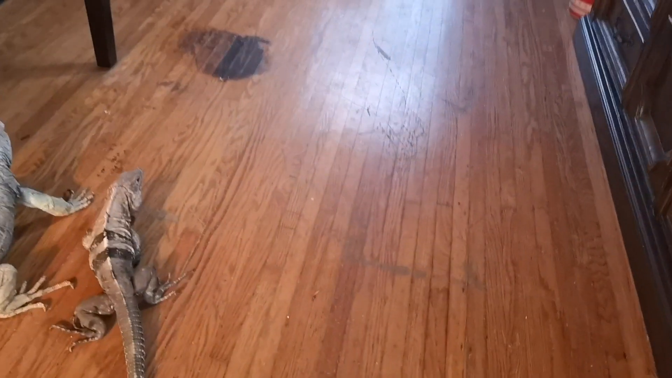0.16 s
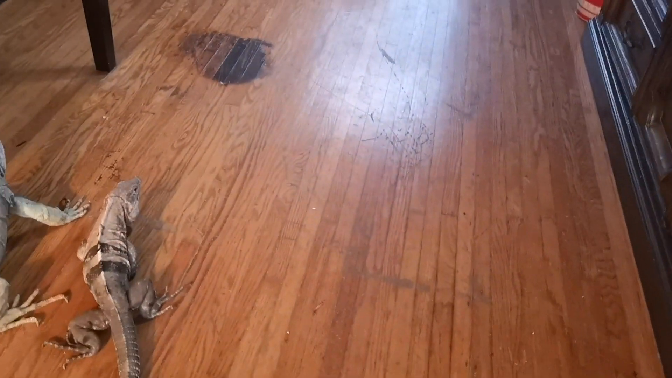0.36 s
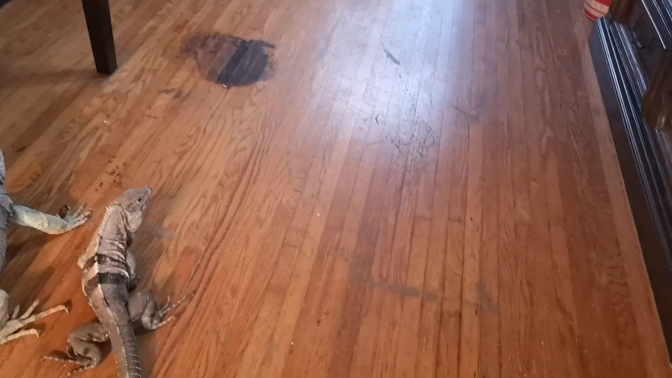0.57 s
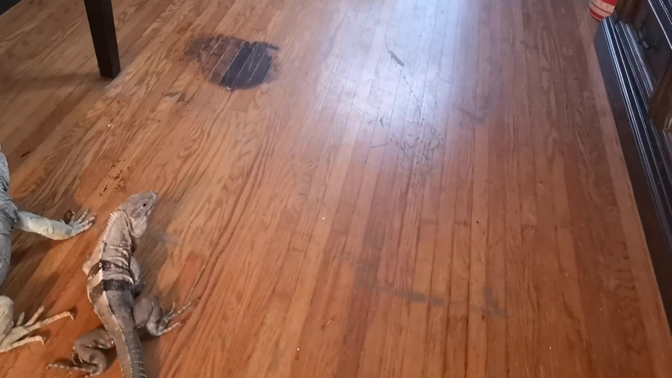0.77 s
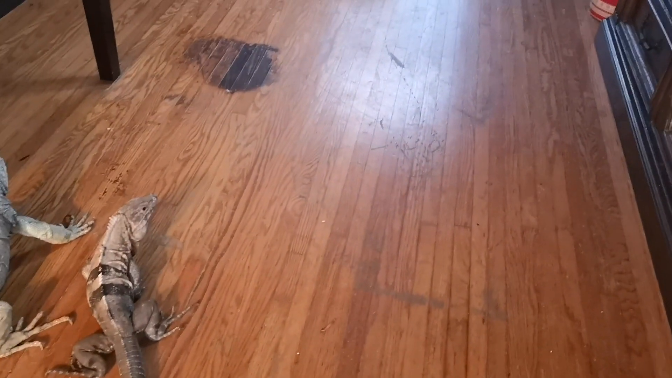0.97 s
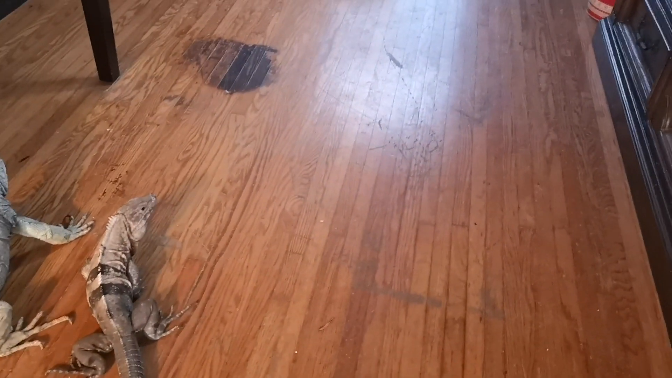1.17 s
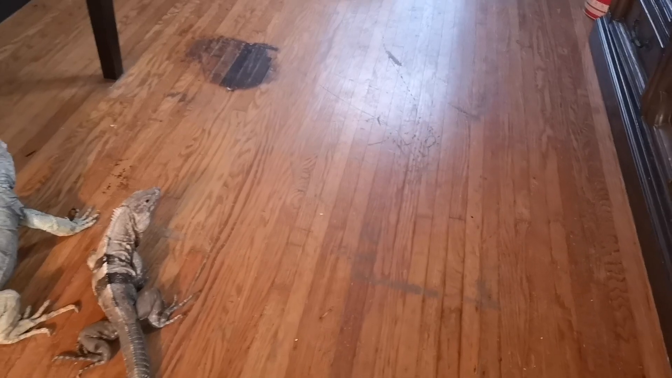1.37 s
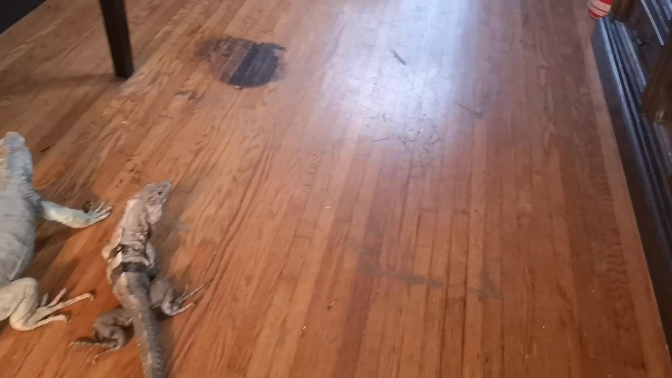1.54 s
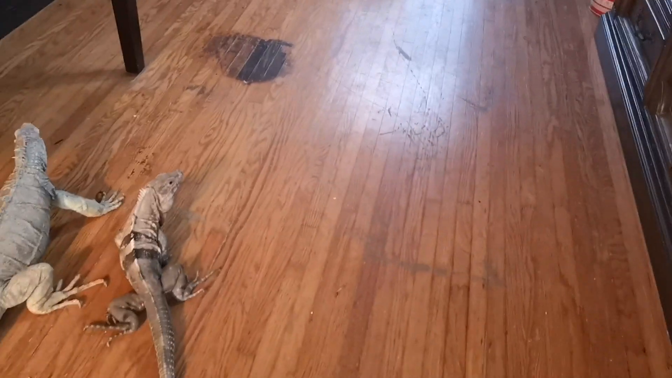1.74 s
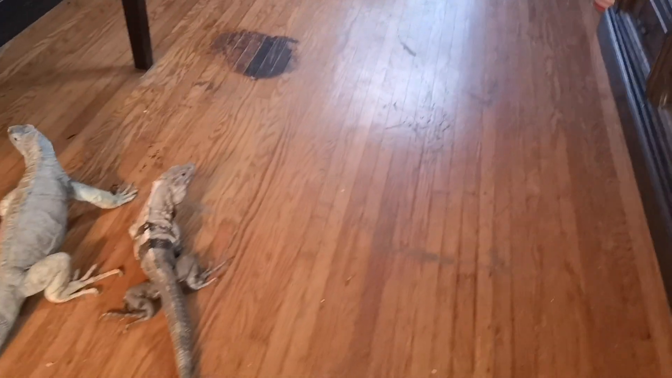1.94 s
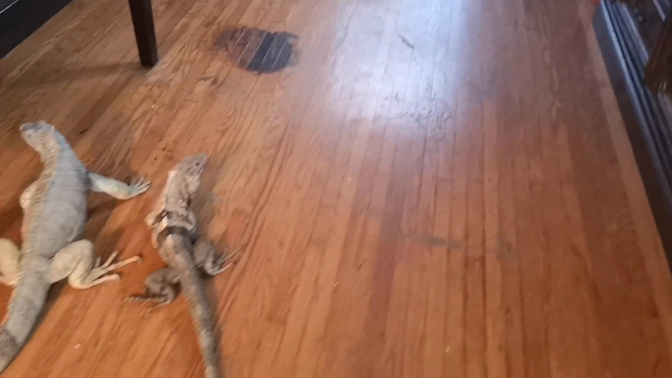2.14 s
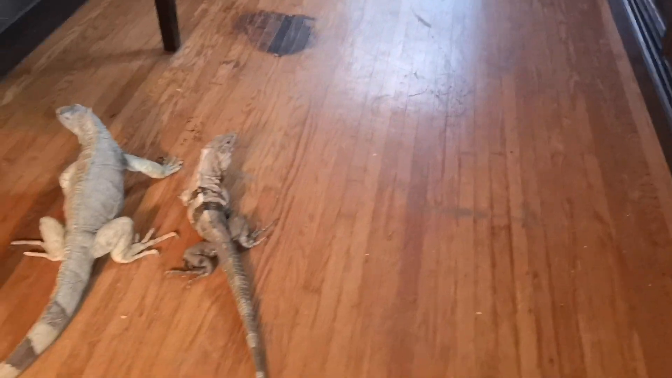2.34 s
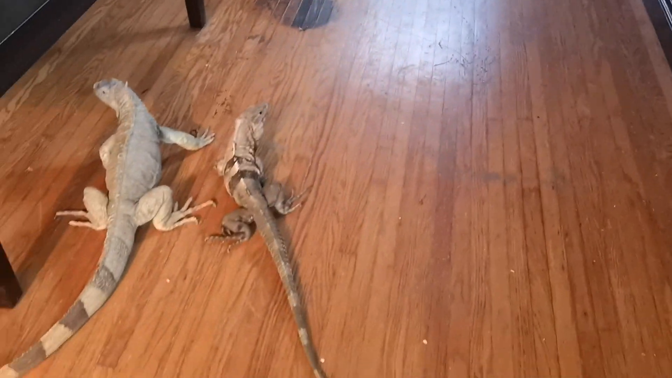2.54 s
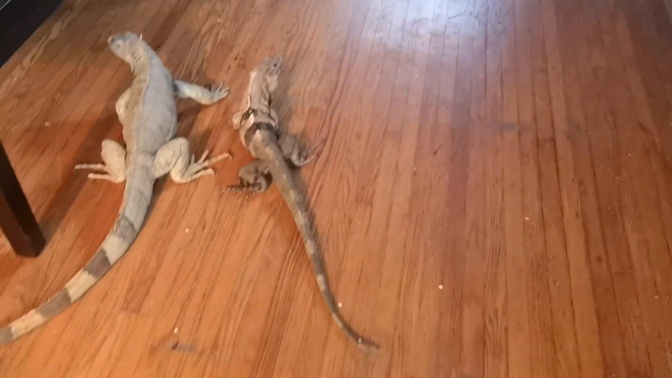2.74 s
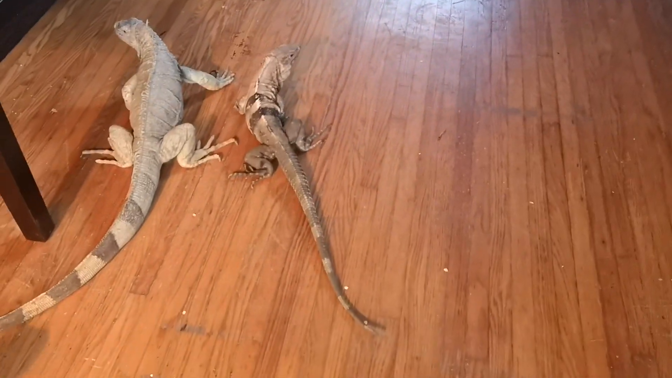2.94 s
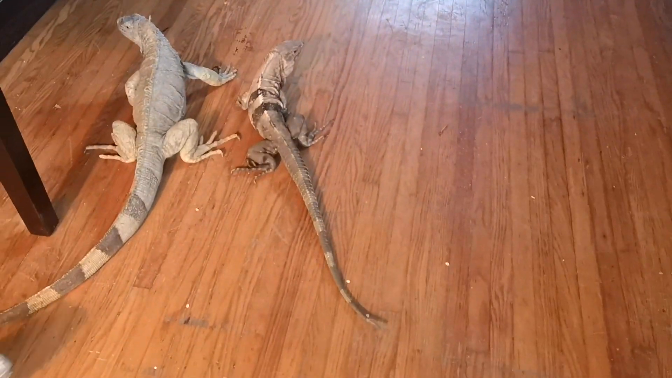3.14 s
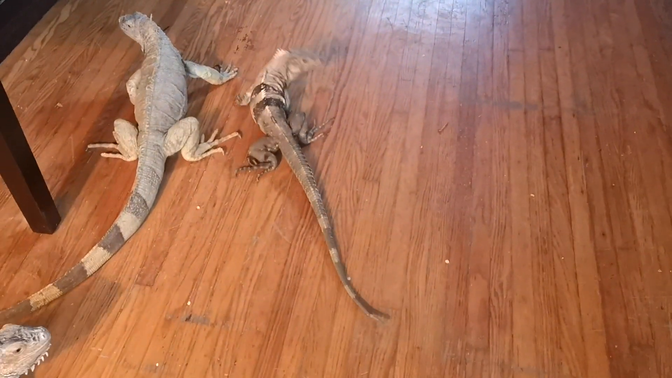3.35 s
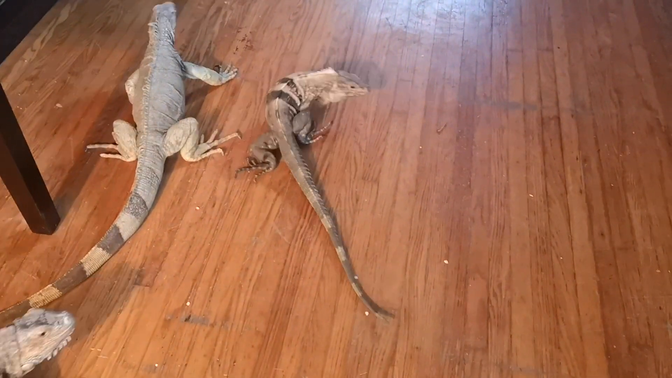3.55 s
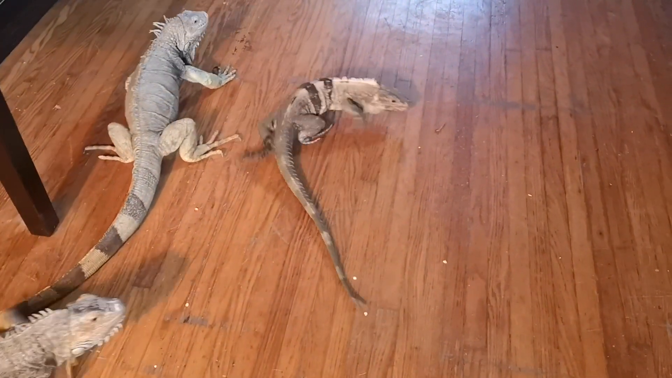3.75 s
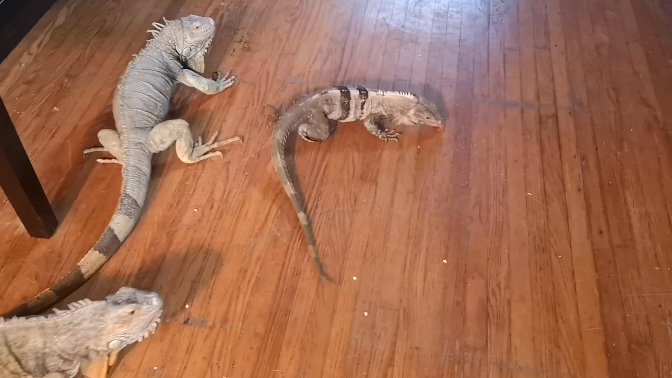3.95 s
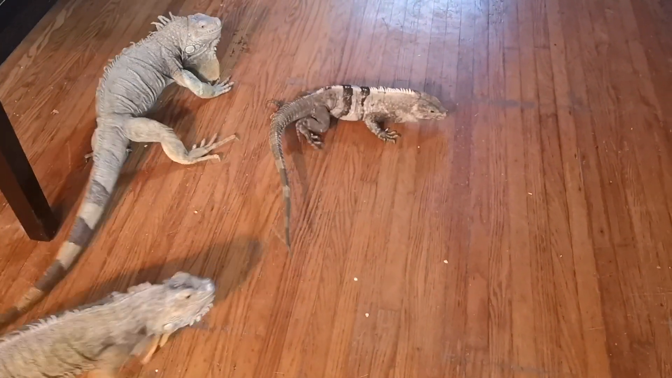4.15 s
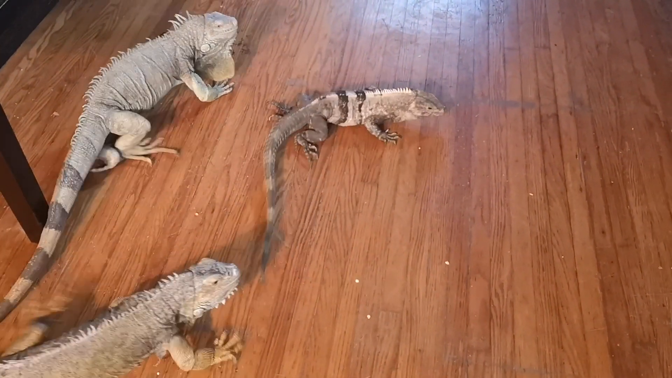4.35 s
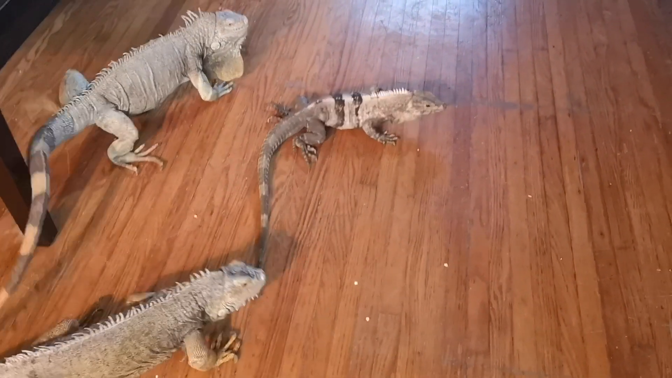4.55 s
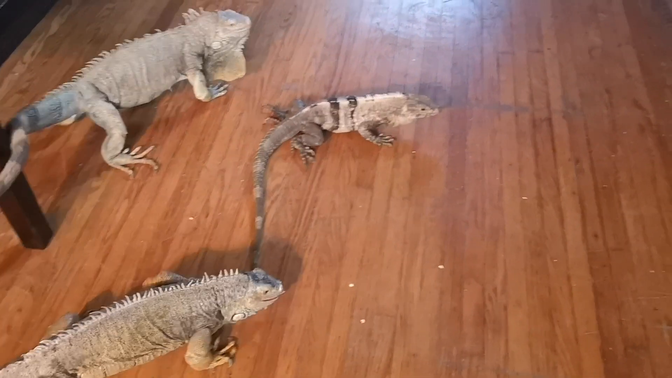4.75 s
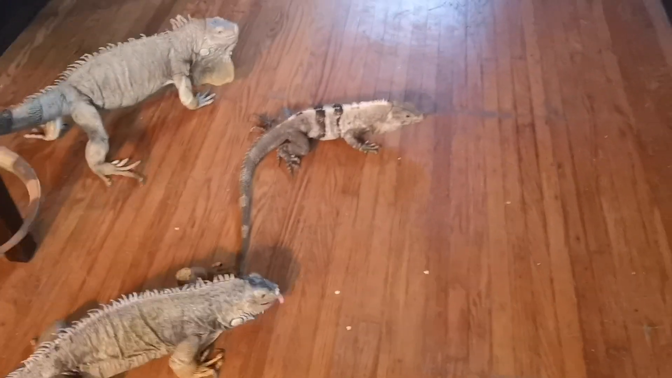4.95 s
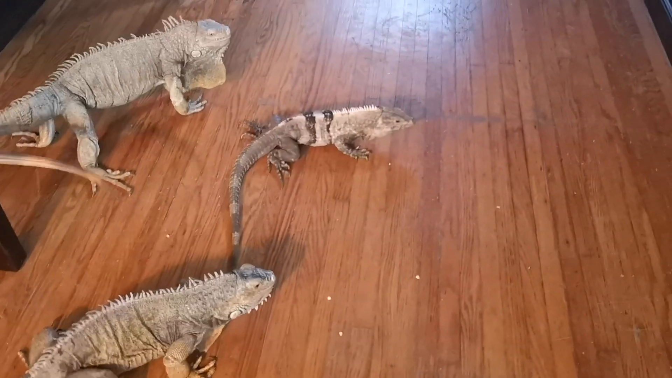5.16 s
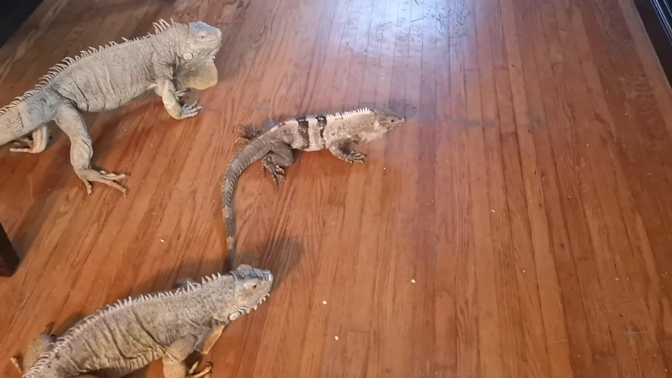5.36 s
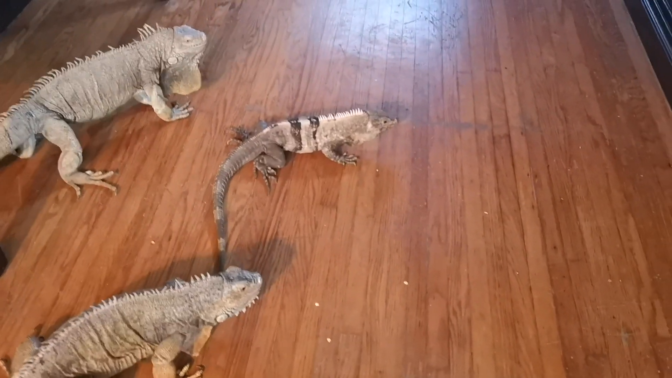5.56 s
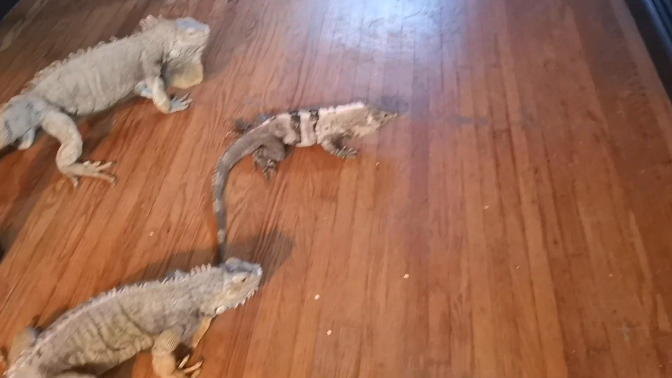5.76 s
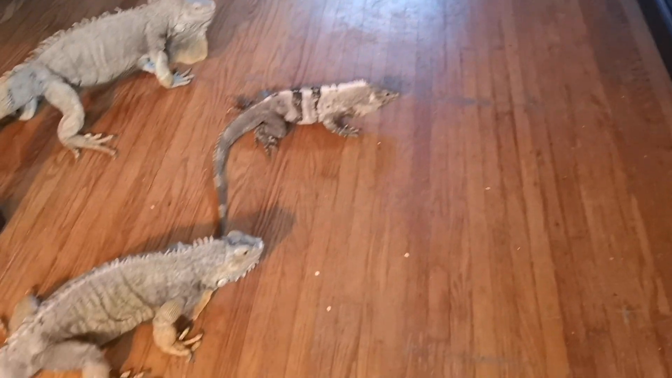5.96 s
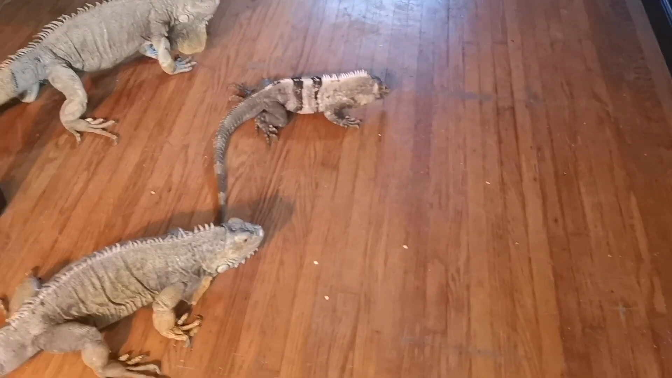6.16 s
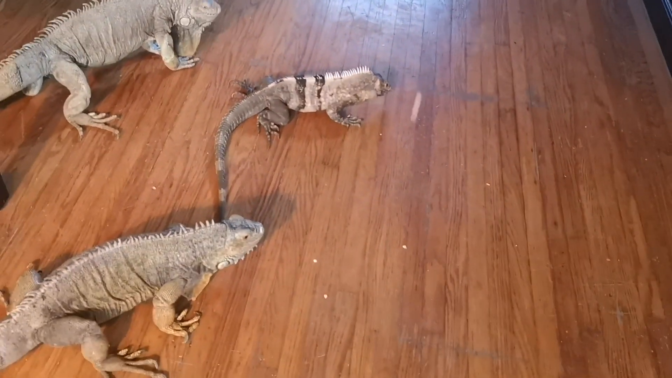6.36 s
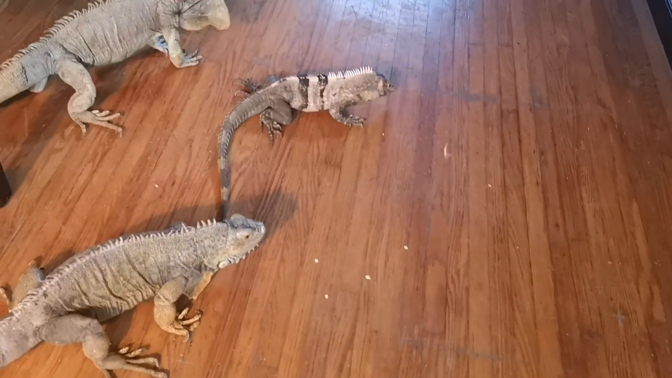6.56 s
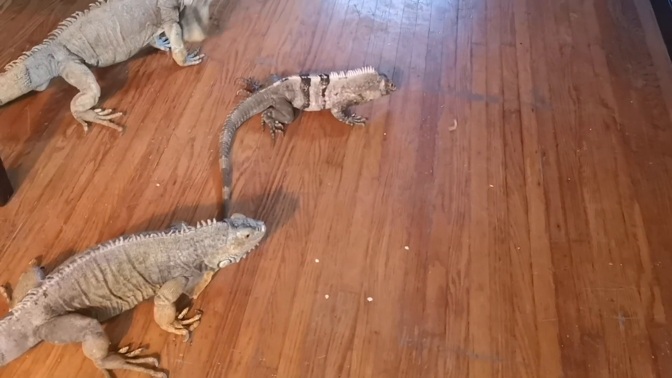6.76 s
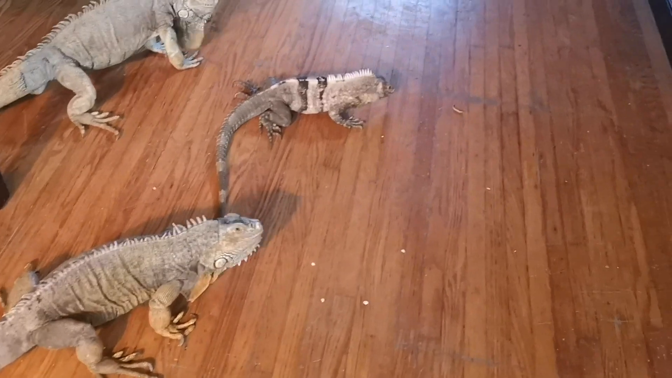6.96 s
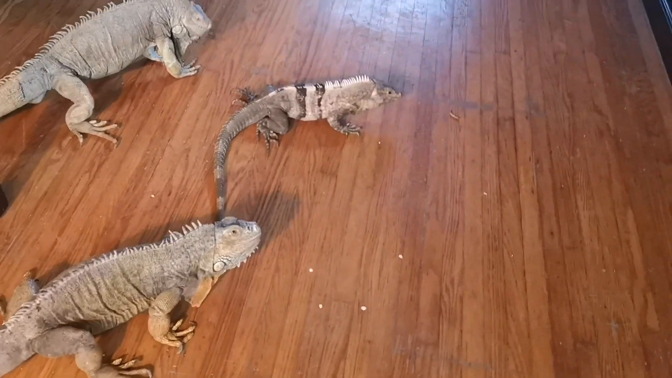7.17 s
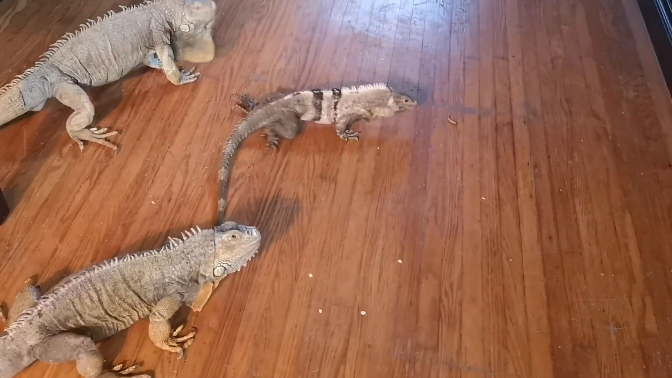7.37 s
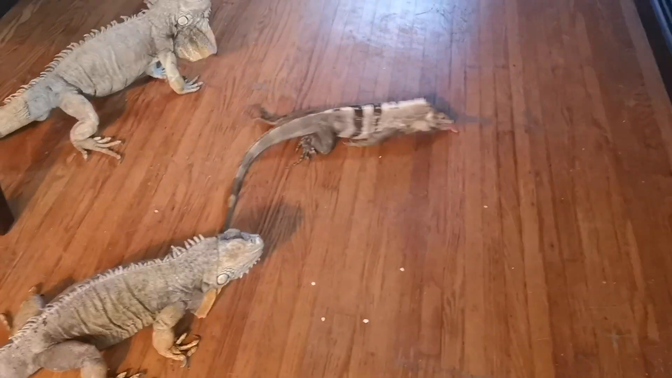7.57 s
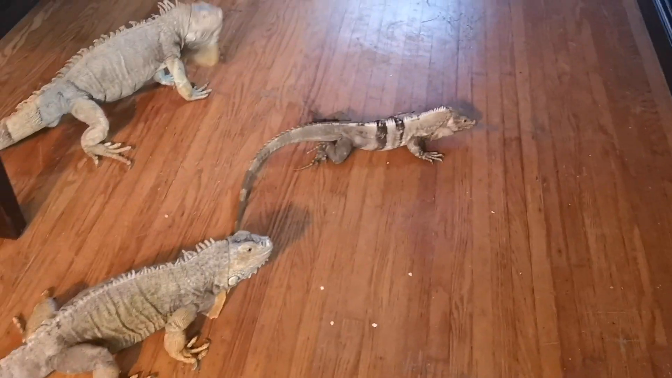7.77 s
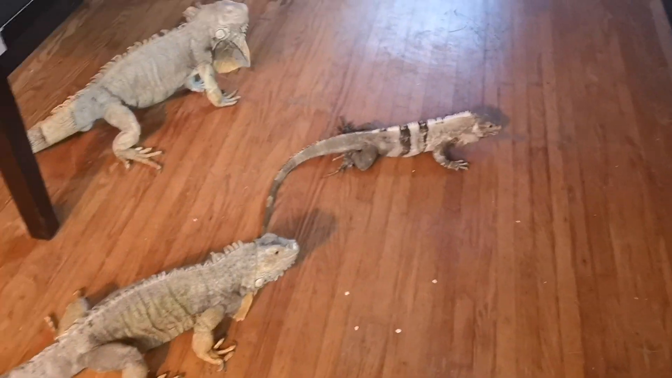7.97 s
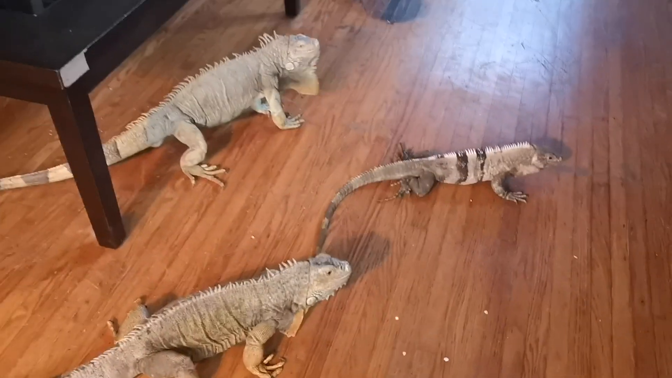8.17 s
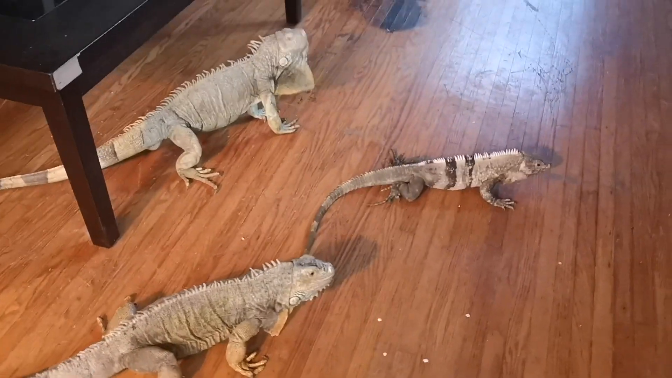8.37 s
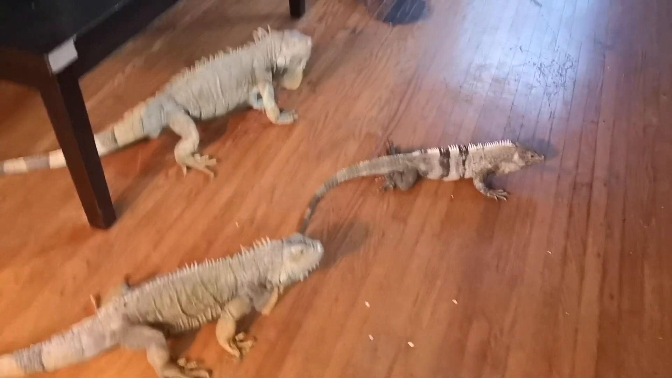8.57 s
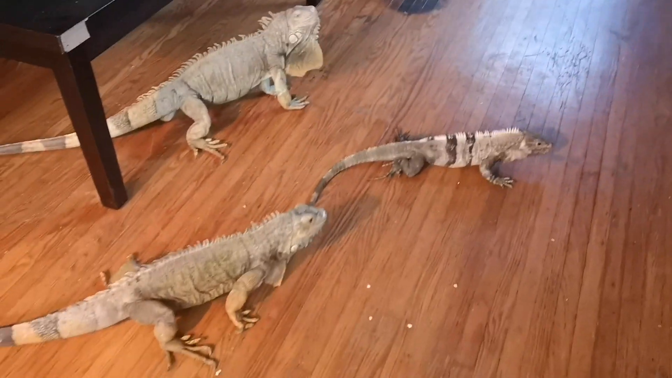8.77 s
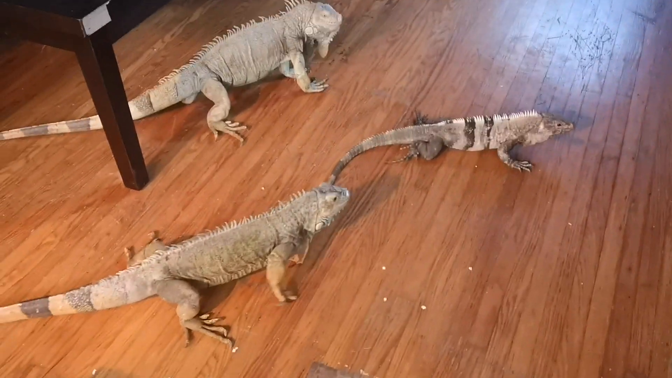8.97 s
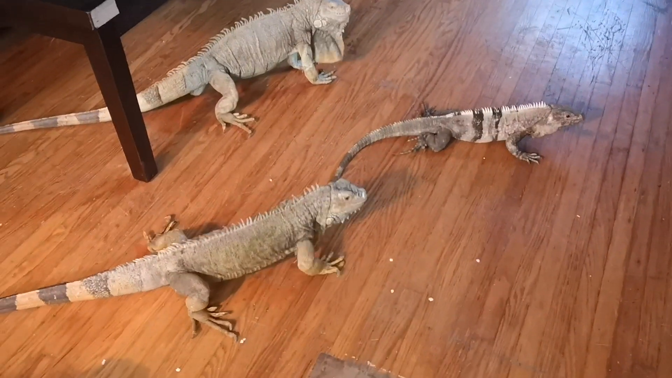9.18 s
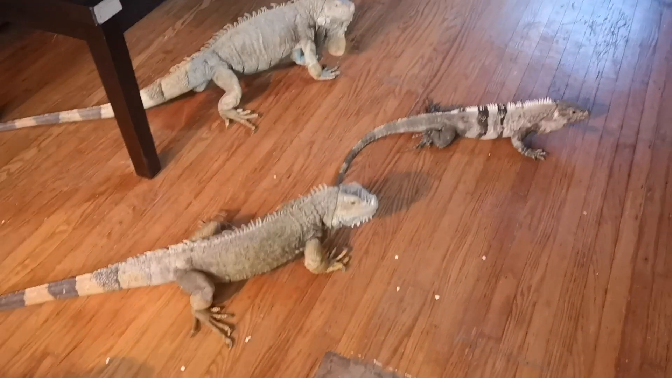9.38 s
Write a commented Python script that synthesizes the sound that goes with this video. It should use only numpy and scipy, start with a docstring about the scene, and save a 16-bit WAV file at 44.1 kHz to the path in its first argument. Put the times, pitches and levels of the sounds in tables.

```python
"""A living room with a hardwood floor, heard from a step away: three lizards walk about.
Claws tick and skid as random frictional catches that excite the boards and the claw tips;
bellies and tails slide as coloured friction noise; feet and bodies thud as damped floor modes.
Once something lands with a loud knock and a sharp clack, a crack that rings on very briefly.
Filtered noise forms the faint room rumble; decaying noise forms the reverberation."""
import sys
import numpy as np
from scipy import signal
from scipy.fft import rfft, irfft
from scipy.io import wavfile

SR = 44100
rng = np.random.default_rng(int(sys.argv[2]) if len(sys.argv) > 2 else 0)


def output_pcm(signal):
    """Save a mono or channel-first signal as 16-bit PCM at the path in sys.argv[1].

    Samples are clipped to [-1, 1] before scaling.
    """
    pcm = np.clip(np.atleast_2d(signal).T, -1, 1) * 32767
    wavfile.write(sys.argv[1], SR, np.round(pcm).astype(np.int16))


N = 415422


def from_db(db):
    """Level to amplitude ratio: 20 dB per factor of ten."""
    return 10 ** (np.asarray(db) / 20)


def rms_one(x):
    """Power normalisation: scale to rms 1."""
    return x / np.sqrt(np.mean(x ** 2) + 1e-20)


def energy_one(x):
    """Energy normalisation: scale each channel to unit energy."""
    return x / np.sqrt(np.sum(x ** 2, axis=-1, keepdims=True) + 1e-20)


def at_hz(points, hz):
    """Logarithmic frequency scale: interpolate a table between its frequencies."""
    known, values = np.transpose(points)
    return np.interp(np.log(np.maximum(hz, 1)), np.log(known), values)


def swell(s, hold_s, rise_db_per_s, fall_db_per_s):
    """Exponential growth and decay: gain rises to 1 at s, holds, then dies away."""
    t = np.arange(N) / SR - s
    before, after = np.minimum(t, 0), np.maximum(t - hold_s, 0)
    return from_db(rise_db_per_s * before - fall_db_per_s * after)


def colour(x, spectrum, size=4096):
    """Minimum-phase filtering: folding the cepstrum gives a causal response with this spectrum."""
    hz = np.arange(size // 2 + 1) * SR / size
    cepstrum = irfft(np.log(from_db(at_hz(spectrum, hz))))
    cepstrum[1:size // 2] *= 2
    cepstrum[size // 2 + 1:] = 0
    response = irfft(np.exp(rfft(cepstrum)))
    return signal.fftconvolve(x, response)[:len(x)]


def ring(x, hz, t60):
    """Damped resonance: a unit click starts a decaying sine of height about 1."""
    r, w = from_db(-60 / (t60 * SR)), 2 * np.pi * hz / SR
    return signal.lfilter([0, np.sin(w)], [1, -2 * r * np.cos(w), r * r], x + 1e-18)


def grains(length, per_s, spread_db):
    """Poisson-like friction: random tiny catches of uneven size and either sign."""
    sizes = from_db(spread_db * np.minimum(rng.exponential(1, length), 4))
    signs = rng.choice([-1, 1], length)
    return sizes * signs * (rng.random(length) < per_s / SR)


def add(out, s, sound):
    """Superposition: mix a sound in at time s."""
    part = out[..., max(round(s * SR), 0):][..., :sound.shape[-1]]
    part += sound[..., :part.shape[-1]]


# likeness of the two channels in a diffuse field: (f/Hz, correlation/1)
LIKENESS = [(50, 1), (130, 0.97), (280, 0.82), (550, -0.56), (1200, 0.023), (2300, 0.15), (8000, -0.13)]


def stereo_noise(length):
    """Diffuse-field coherence: white noise alike in both channels in the bass, less so higher up."""
    alike = np.clip(at_hz(LIKENESS, np.arange(length // 2 + 1) * SR / length), -.99, .999)
    mid, side = rfft(rng.standard_normal((2, length)))
    mid, side = mid * np.sqrt(1 + alike), side * np.sqrt(1 - alike)
    return irfft(np.array([mid + side, mid - side]), length)


# reverberation time of the room: (f/Hz, t60/s)
ROOM_T60 = [(100, 0.63), (400, 0.51), (1000, 0.52), (2200, 0.44), (5000, 0.41), (8000, 0.39), (15000, 0.3)]


def room_tail(gap_s, early=0.99, early_s=0.22, size=28000, count=9):
    """Reverberation: noise bands decay at their own rates after a short gap, strengthened early on."""
    t, hz = np.arange(size) / SR, np.arange(size // 2 + 1) * SR / size
    noise, centres, tail = rfft(stereo_noise(size)), np.geomspace(100, 15000, count), 0
    for centre, share in zip(centres, np.eye(count)):
        band = irfft(noise * at_hz(np.c_[centres, share], hz))
        tail = tail + band * from_db(-60 * t / at_hz(ROOM_T60, centre))
    onset = 1 - np.exp(-(t / gap_s) ** 2)
    return energy_one(tail * onset * (1 + early * np.exp(-t / early_s)))


def in_room(sound, tail, wet_db, pan_db, lag):
    """Interaural level and time differences: panned direct sound, right late by lag/s, plus the room."""
    out = from_db(wet_db) * signal.fftconvolve(sound[None], tail, axes=1)
    left, right = energy_one(from_db(np.array([pan_db, -pan_db]) / 2)) * np.sqrt(2)
    add(out[0], 0, left * sound)
    add(out[1], max(lag, 0), right * sound)
    return out


# colour of the room's steady rumble and hiss: (f/Hz, level/dB)
AMBIENCE = [(12, -45), (20, -4), (65, -2), (91, -13.5), (123, -7.5), (172, -16), (234, -12.5), (367, -21),
            (574, -26), (759, -26.5), (1290, -26), (2990, -33.5), (6910, -39), (8410, -39), (16000, -56)]
AMBIENCE_DB = -56
# one slow, deep bump: (t/s at full strength, hold/s, level/dB)
BUMP = (8.26, 0.087, -45.5)


def background():
    """Stationary noise: filtered rumble and hiss, with one swell of a low band."""
    air = rms_one(np.array([colour(side, AMBIENCE) for side in stereo_noise(N)]))
    low_band = signal.butter(2, [26, 60], "band", fs=SR, output="sos")
    deep = rms_one(signal.sosfilt(low_band, rng.standard_normal(N)))
    s, hold_s, db = BUMP
    bump = from_db(db) * swell(s, hold_s, rise_db_per_s=570, fall_db_per_s=395) * deep
    return from_db(AMBIENCE_DB) * air + bump


# a faint low squeak near 600 Hz, likely a tail rubbing: (t/s at full strength, hold/s, level/dB)
SQUEAKS = [(5.088, .03, -69), (5.366, 0.032, -62.5)]


def squeak(pitch_hz=600):
    """Stick-slip: small slips ring one resonance."""
    slips = rms_one(ring(grains(N, per_s=500, spread_db=2), pitch_hz, .022))
    strength = sum(from_db(db) * swell(s, hold_s, rise_db_per_s=120, fall_db_per_s=197.5)
                   for s, hold_s, db in SQUEAKS)
    return in_room(strength * slips, room_tail(gap_s=0.0063), 0, 0, 0)[:, :N]


# colour of the boards' answer: (f/Hz, level per Hz/dB)
BOARD = [(300, -36), (550, -18.5), (800, -11), (1200, -6), (1800, 1.5), (2600, 6.5), (3400, -4.5),
         (5000, -11.5), (9000, -32), (15000, -32.5)]
# colour of scales rubbing on wood: (f/Hz, level per Hz/dB)
SCALES = [(1500, -0.5), (3000, -1.5), (5000, -2), (7600, 6), (9000, -1), (11000, -19), (15000, -21)]
# bellies and tails sliding: (t/s at full speed, hold/s, board level/dB, hiss level/dB)
SLIDES = [(0.75, 0.36, -64.5, -67), (2.534, 0.19, -75, -64), (2.845, 0.85, -69, -66.5),
          (3.763, 0.27, -56.5, -53.5), (4.027, 0.14, -48, -50), (4.312, 0.0793, -48.5, -45),
          (7.524, 0.19, -51.5, -51), (9.056, 0.016, -53, -56)]
SLIDE_RISE_DB_PER_S, SLIDE_FALL_DB_PER_S = 124, 126


def sliding(wet_db=-2, lowest_hz=950):
    """Friction noise: scales and claws catch on the grain, too lightly to stir the boards' low notes."""
    catches = grains(N, per_s=1000, spread_db=5.0)
    catches = signal.sosfilt(signal.butter(2, lowest_hz, "high", fs=SR, output="sos"), catches)
    board, hiss = rms_one(colour(catches, BOARD)), rms_one(colour(catches, SCALES))
    sound = 0
    for s, hold_s, board_db, hiss_db in SLIDES:
        speed = swell(s, hold_s, SLIDE_RISE_DB_PER_S, SLIDE_FALL_DB_PER_S)
        sound = sound + speed * (from_db(board_db) * board + from_db(hiss_db) * hiss)
    return in_room(sound, room_tail(gap_s=0.00067), wet_db, 0, 0.00021)[:, :N]


# colour of the claw tip's tick: (f/Hz, level per Hz/dB)
TIP = [(1500, -77), (3000, -0.5), (4200, 0), (5700, 4), (6500, 2.5), (7600, 6), (8500, -3), (9400, -4),
       (10800, -17), (15000, -22)]


def claw(force, bright_db, hz, ring_db, ring_t60):
    """Forced response: contact force rings the board around its own pitch and makes the claw tip tick."""
    board = energy_one(colour(force, BOARD))
    ringing = energy_one(ring(board, hz, ring_t60))
    board = energy_one(board + from_db(ring_db) * ringing)
    return board + from_db(bright_db) * energy_one(colour(force, TIP))


# mean tick rate, level at full speed, and fade before and after each slide
STRAY_PER_S, STRAY_DB, STRAY_FADE_DB_PER_S = 12, -65.5, 43


def stray_ticks(wet_db=0):
    """Random impacts: while a lizard drags itself along, its other claws shift and tick lightly."""
    moving = np.max([swell(s, hold_s, STRAY_FADE_DB_PER_S, STRAY_FADE_DB_PER_S)
                     for s, hold_s, *_ in SLIDES], axis=0)
    force = grains(N, per_s=STRAY_PER_S, spread_db=3.5)
    ticks = rms_one(claw(force, bright_db=0, hz=2040, ring_db=-0.5, ring_t60=.003))
    sound = from_db(STRAY_DB) * moving * ticks
    return in_room(sound, room_tail(gap_s=0.0018), wet_db, 0, .0002)[:, :N]


# floor modes before scatter and weighting: (f/Hz, level/dB, t60/s)
FLOOR_MODES = [(58.4, -8.5, 0.18), (83.8, 3, 0.12), (119.5, -0.5, 0.19), (148.5, -7, 0.094),
               (177.5, 1.5, 0.21), (215.4, -2, 0.1), (265, -1, 0.098), (318, -5.5, 0.061),
               (420, -17, 0.0098), (715, -6, 0.021), (900, -17, 0.031)]
# feet and bodies thudding on the floor: (t/s, level/dB, hardness/dB, pitch f/Hz)
THUDS = [(.508, -4, -3.5, 88), (.671, -18, -11, 208), (2.135, -13.5, -25, 142), (2.214, -13, -43, 72),
         (3.364, -20.5, -37, 145), (3.635, -14.5, -44, 101), (3.986, -16.5, -46, 114),
         (4.096, -13, -19, 103), (4.445, -10, 6, 303), (5.486, 3, 4, 215), (5.495, 1, -12, 180),
         (5.725, -16.5, -12, 235), (7.629, -19, -43, 72.6)]
SETTLE_S, SETTLE_DB = .03, -3.5   # the weight settles with a second, softer blow


def thuds(wet_db=-3, hard_hz=400, usual_hardness_db=-16, octave_db=9, settle_hz=250, size=16000, count=5):
    """Modal excitation: weight rings modes near the spot's pitch; harder landings reach upper ones."""
    out, blow = np.zeros((2, N)), signal.unit_impulse(size)
    settle = signal.lfilter(*signal.butter(1, settle_hz, fs=SR), blow)
    add(blow, SETTLE_S, from_db(SETTLE_DB) * settle)
    tails = [room_tail(gap_s=0.0045) for _ in range(count)]
    radiation = signal.butter(2, [68, 1100], "band", fs=SR, output="sos")
    for k, (s, db, hardness_db, pitch_hz) in enumerate(THUDS):
        boom = 0
        for hz, mode_db, t60 in FLOOR_MODES:
            upper = hz ** 2 / (hz ** 2 + hard_hz ** 2)
            octaves_away = abs(np.clip(np.log2(hz / pitch_hz), -2, 1))
            hardness_gain_db = upper * (hardness_db - usual_hardness_db)
            strength = from_db(mode_db + hardness_gain_db - octave_db * octaves_away)
            boom = boom + strength * ring(blow, hz * (1 + rng.normal(0, 0.034)), t60)
        boom = energy_one(signal.sosfilt(radiation, boom))
        add(out, s, in_room(from_db(db) * boom, tails[k % count], wet_db, 0, 0))
    return out


# colour of a hard crack: (f/Hz, level per Hz/dB)
CRACK = [(700, -17), (1100, -11), (2500, -15.5), (4000, -13.5), (5800, -9), (7500, -11.5), (9000, -14),
         (10500, -20.5), (15000, -35)]
# hard, ringing clacks: (t/s, level/dB, ringing f/Hz, ringing t60/s, left-right level/dB)
CLACKS = [(.5686, -14.5, 7800, 0.002, 26), (4.108, -8, 6700, .002, 5), (4.8746, -14.5, 5850, 0.0055, 16),
          (5.044, -16.5, 5300, .004, 17), (5.5103, 5.5, 7200, .0017, 22), (5.5129, 4, 6000, 0.0007, -7),
          (5.5167, -3.5, 8500, 0.005, -15), (7.635, -24, 7500, .002, 6), (8.185, -36.5, 13000, 0.0005, -21)]


def clacks(crack_db=-8, wet_db=-4, lag=.00008, size=2048):
    """Impact of hard bodies: a bright crack through two equal resonances swells, then rings briefly."""
    out, tail = np.zeros((2, N)), room_tail(gap_s=0.00069)
    crack = energy_one(colour(signal.unit_impulse(size), CRACK))
    for s, db, hz, t60, pan_db in CLACKS:
        ping = energy_one(ring(ring(crack, hz, t60), hz, t60))
        sound = energy_one(ping + from_db(crack_db) * crack)
        add(out, s, in_room(from_db(db) * sound, tail, wet_db, pan_db, lag))
    return out


def slip(bright_db, hz, swell_s, size=8192):
    """Sliding friction: a burst of catches on the board swells and fades."""
    t = np.arange(size) / SR
    force = grains(size, per_s=3000, spread_db=4.0) * t * np.exp(-t / max(swell_s, .002))
    return claw(force, bright_db, hz, ring_db=-1.5, ring_t60=0.004)


# claws scratching along the grain:
# (t/s, board level/dB, claw tip over board level/dB, board f/Hz, left-right level/dB, swell time/s)
SCRATCHES = [(.305, -21, -1, 2260, -5, 0.018), (.522, -19, -9, 1500, 0, 0.013),
             (1.487, -14, -9.5, 3000, 0, 0.02), (1.718, -19, -7.5, 1610, -12, 0.018),
             (2.222, -13, -19, 960, 2, 0.0049), (2.972, -8, -8, 1870, -2, 0.0076),
             (3.586, -12.5, -14, 766, 6, .006), (3.954, -2, -7, 1930, -7.5, .011),
             (4.444, -9, -18, 467, 18, 0.016), (4.452, -7, 1.5, 1930, -1, 0.012),
             (4.548, -18, -5, 1150, 4, 0.0076), (4.934, -17, 4, 2080, 1, .011),
             (5.041, -22.5, 2, 5200, -4, 0.0089), (6.44, -45, -16, 1410, 0, .018),
             (7.415, -29.5, 6, 3000, -6, 0.0052), (8.22, -29.5, -8, 1660, -7, 0.03),
             (8.65, -23, -14, 2130, 13, 0.024), (9.058, -14, -3, 2450, -1.5, 0.017)]


def scratches(wet_db=-1.5, lag=.0002, count=6):
    """Loss of static friction: a planted foot pushes off and slips."""
    out, tails = np.zeros((2, N)), [room_tail(gap_s=0.00044) for _ in range(count)]
    for k, (s, db, bright_db, hz, pan_db, swell_s) in enumerate(SCRATCHES):
        sound = from_db(db) * slip(bright_db, hz, swell_s)
        add(out, s, in_room(sound, tails[k % count], wet_db, pan_db, lag * rng.uniform(0, 2)))
    return out


def tap(bright_db, hz, catch_s=0.0037, touch_s=.00097, first=1.9, size=4096):
    """Impact then friction: one claw lands and catches on the grain for a few milliseconds."""
    t = np.arange(size) / SR
    envelope = (1 - np.exp(-t / touch_s)) * np.exp(-t / catch_s)
    force = grains(size, per_s=3000, spread_db=4.5) * envelope
    force[0] = first
    return claw(force, bright_db, hz, ring_db=1, ring_t60=0.0014)


# feet coming down claws first: (t/s, board level/dB, claw tip over board level/dB, board f/Hz,
# mean left-right level/dB, skid over landing level/dB)
STEPS = [(.5094, -15.5, -9.5, 1270, -3, -6), (.6777, -27.5, -17, 1190, -8, -4.5),
         (1.0865, -20.5, 0.5, 2260, 3, -1.5), (1.1956, -9.5, 0.5, 2270, 0, -7),
         (1.8559, -14.5, -0.5, 2920, 0, -1), (1.9568, -14.5, -4, 2520, 0, -20),
         (2.0897, -26, -8, 2230, 2, -5), (2.1553, -24, -13.5, 1300, -2, 6), (2.2102, -15, -3.5, 1850, 2, 6),
         (2.5915, -8.5, -0.5, 1960, 1, -10), (2.7082, -26.5, 5.5, 2280, 5, -9),
         (3.1566, -22, -11, 1560, -2, -16), (3.1911, -24, 3.5, 1740, -17, -17),
         (3.5298, -19, -3, 2650, -3, -2), (3.5754, -7, 1.5, 1740, 3.5, -4.5),
         (3.7362, -28, 11, 1880, -4, -8), (3.8656, -18, -3.5, 2330, -1, -4), (3.9438, -17, -4, 2170, 1, -8),
         (4.036, -3, -2, 1900, -5, -17), (4.1063, -12.5, 8.5, 2220, 2, -5),
         (4.1688, -14.5, 8, 2230, 0, -24), (4.3936, -4.5, -6, 1980, -10, -19),
         (4.779, -7.5, -1, 3050, 0, -3.5), (4.8733, -15, 4.5, 2010, -2, -20.5),
         (5.1814, -20, -6, 2100, -3, 0), (5.486, -6.5, -4, 1950, 0.5, -23.5),
         (5.724, -22.5, -16, 1380, -1, -14), (6.0705, -40, -2.5, 2340, 9, -18),
         (6.552, -20, -1, 1400, -4, -6), (7.0119, -32.5, -26, 1300, -2, -18), (7.2599, -37, 5, 3120, 0, -3),
         (7.2987, -30, -12.5, 1680, 2, -20), (7.4812, -27.5, 10.5, 2600, -10, 1),
         (7.6302, -15.5, 2.5, 2310, -17, -8), (8.1254, -46.5, 9, 1800, 4, -14.5),
         (8.768, -27.5, -2, 1070, -13, -10.5), (9.2305, -22.5, -2, 2060, -3, -4)]
LEAD_S, LEAD_DB = .011, -19   # a faint rustle leads into each landing
NEXT_CLAW_S, NEXT_CLAW_DB = .009, -5   # mean delay and relative level of the second claw
PAN_SCATTER_DB = 6   # between the parts of one step


def steps(skid_s=0.018, skid_tip_db=-1.0, lead_swell_s=0.00577, wet_db=-0.4, lag=.0002, count=8):
    """Successive contacts: a faint lead-in, one claw lands, the next follows, and the foot skids."""
    out, tails = np.zeros((2, N)), [room_tail(gap_s=0.0015) for _ in range(count)]
    for k, (s, db, bright_db, hz, pan_db, skid_db) in enumerate(STEPS):
        lead_in = from_db(LEAD_DB) * slip(bright_db, hz, lead_swell_s)
        landing = tap(bright_db, hz)
        next_s = NEXT_CLAW_S * rng.uniform(.8, 1.2)
        next_claw = from_db(NEXT_CLAW_DB) * tap(bright_db, hz)
        skid = from_db(skid_db) * slip(bright_db + skid_tip_db, hz, skid_s)
        parts = [(-LEAD_S, lead_in), (0, landing), (next_s, next_claw), (0, skid)]
        for after_s, sound in parts:
            side_db = pan_db + rng.normal(0, PAN_SCATTER_DB)
            placed = in_room(from_db(db) * sound, tails[k % count], wet_db, side_db, lag * rng.uniform(0, 2))
            add(out, s + after_s, placed)
    return out


def scene():
    """Superposition: all the contacts with the floor, over the quiet room."""
    floor = squeak() + sliding() + stray_ticks() + thuds() + clacks() + scratches() + steps()
    return background() + floor


# unequal microphone ports: (f/Hz, left-right level/dB)
PORTS = [(60, -0.5), (120, 1), (240, 0), (480, -1.5), (950, 2), (1890, -0.5), (3770, 0.5), (7520, 3),
         (15000, -7.5)]
CUTOFF_HZ = 15500


def record(dry):
    """Transduction: each microphone port has its colour, the highest peaks overload, the top is cut."""
    # each side takes half the level difference
    heard = [colour(side, np.array(PORTS) * [1, share]) for side, share in zip(dry, (.5, -.5))]
    limited = np.clip(heard, -.9, .9)
    return signal.sosfilt(signal.ellip(10, .2, 80, CUTOFF_HZ, fs=SR, output="sos"), limited)


dry = scene()
out = record(dry)
output_pcm(out)
```